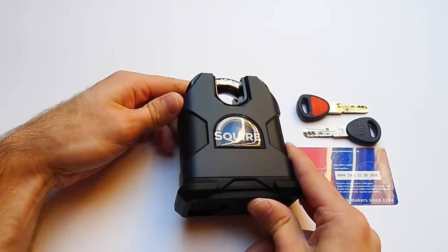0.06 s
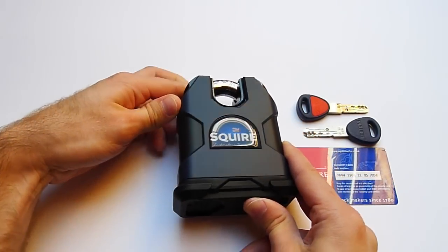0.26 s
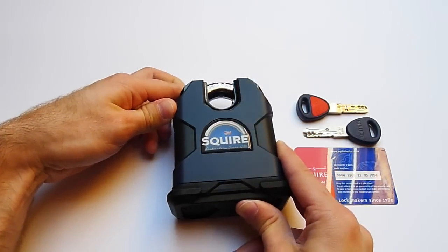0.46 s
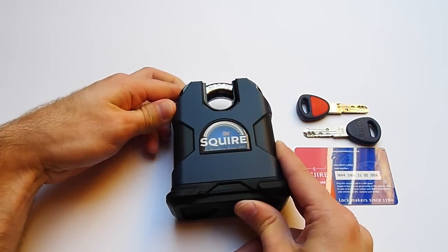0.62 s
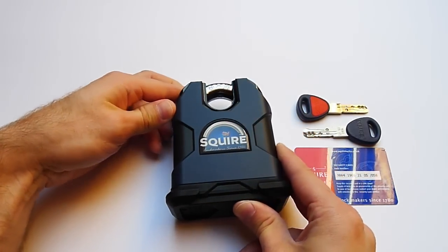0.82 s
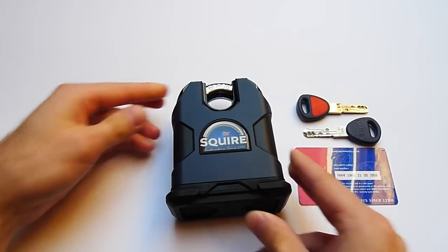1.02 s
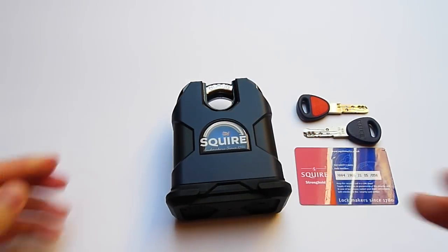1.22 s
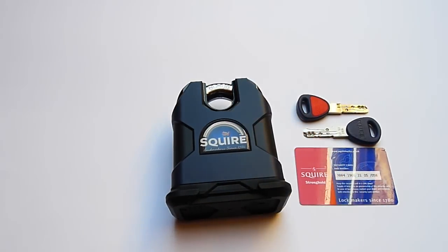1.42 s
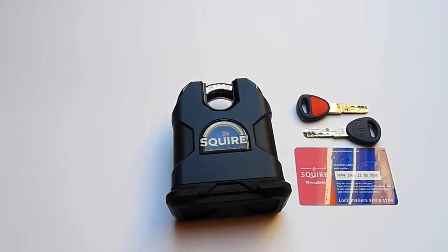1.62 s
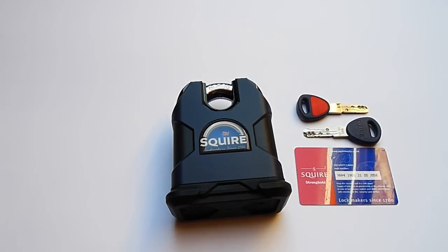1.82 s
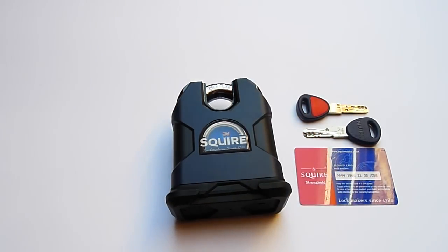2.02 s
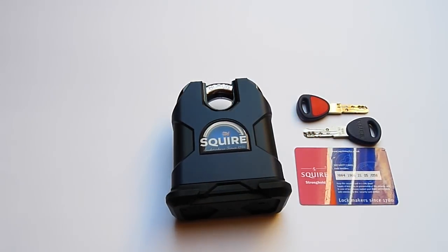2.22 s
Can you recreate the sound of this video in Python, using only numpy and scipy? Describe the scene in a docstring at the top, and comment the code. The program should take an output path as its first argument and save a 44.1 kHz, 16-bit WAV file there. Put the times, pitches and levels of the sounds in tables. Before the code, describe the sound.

One sharp metallic knock of a padlock landing on a table, followed later by small ticks.

```python
"""A heavy padlock drops flat on a hard table with one sharp knock and a short metallic ring.
Just before, as it is lowered, one edge scuffs and rocks on the table; afterwards fingers bump and
brush it as they let go. Later come a few small, crunchy ticks. It is all heard close up and in
mono, in a small, quiet room with a faint hum and electrical whine."""
import sys
import numpy as np
from scipy import signal
from scipy.fft import rfft, irfft, next_fast_len
from scipy.io import wavfile
from scipy.ndimage import uniform_filter1d

SR = 44100
rng = np.random.default_rng(int(sys.argv[2]) if len(sys.argv) > 2 else 0)


def wav_out(sig):
    """Save sig, one row per channel (or a flat mono array), as 16-bit PCM at SR to the path in sys.argv[1]."""
    wavfile.write(sys.argv[1], SR, np.round(np.clip(np.atleast_2d(sig).T, -1, 1) * 32767).astype(np.int16))


N = 103635
T = np.arange(N) / SR


def padlock_knock():
    """The lock drops flat: returns the hard crack of contact and the metallic ring it sets off."""
    # tone of metal hitting the table: freq_hz, gain_db
    contact_eq = [(100, -19), (300, -8), (700, -1), (1200, 2), (1900, 11), (2800, 7), (3200, 7), (3800, 12),
                  (5100, 8), (5750, -5), (6600, -12), (7500, -7), (7900, 5), (8900, -13), (9700, -28),
                  (12400, -23), (16000, -38)]
    # quick repeats as the lock seats and near surfaces answer: delay_s, level_db
    repeats = [(0.0027, -9), (0.00495, -18.5)]
    # ringing modes of lock and table: pitch_hz, level_db, t60_s
    modes = [(728, -39, 0.07), (1169, -33, 0.061), (1510, -35, 0.07), (1817, -36, 0.069),
             (1897, -29, 0.039), (2249, -33, 0.056), (2653, -23, 0.033), (2710, -24, 0.038),
             (2852, -14, 0.024), (3040, -20, 0.021), (3304, -39, 0.053), (3597, -40, 0.074),
             (3737, -19, 0.03), (4035, -34, 0.052), (4446, -27, 0.035), (4839, -37, 0.043),
             (5197, -31, 0.031), (6679, -46, 0.067), (7781, -34, 0.066), (8044, -46, 0.044),
             (8865, -31, 0.024), (12449, -46, 0.044)]
    knock_s, ring_attack_s = 0.29032, 0.0033
    hits = click(knock_s) + sum(from_db(db) * click(knock_s + delay) for delay, db in repeats)
    crack = colour(hits, contact_eq)
    ringing = sum(from_db(db) * ring(knock_s, hz, t60) for hz, db, t60 in modes)
    fade_in = 1 - np.exp(-since(knock_s) / ring_attack_s)
    return disperse(crack), disperse(fade_in * ringing)


def disperse(x):
    """All-pass resonances smear a sharp impact into a few cycles."""
    # resonances that briefly hold back parts of the impact: centre_hz, q
    resonances = [(2580, .5), (3470, 5.8), (8000, 3.5)]
    for hz, q in resonances:
        _, feedback = signal.iirpeak(hz, q, fs=SR)
        x = signal.lfilter(feedback[::-1], feedback, x + 1e-18)
    return x


def edge_roll():
    """The lock's edge rolls on the table: a low swell of noise just before the drop."""
    # dull tone of the roll: freq_hz, gain_db
    roll_eq = [(80, -34), (280, 3), (450, -4.5), (900, -10), (2500, -36)]
    return from_db(-46) * swell(peak_s=0.278, attack_s=0.028, release_s=0.03) * noise(roll_eq)


def soft_bumps():
    """Lock and fingers bump the table; each thud swells and dies within a few low cycles."""
    # dull thuds: start_s, level_db, pitch_hz, attack_s
    thuds = [(0.194, -36, 86, 0.0077), (0.243, -41.5, 130, 0.0024), (0.518, -34.5, 102, 0.0059),
             (0.545, -40.5, 111, 0.0043), (0.820, -47.5, 150, 0.0045), (0.8295, -32, 286, 0.0028),
             (0.847, -39, 138, 0.0037), (0.849, -44, 310, 0.0028), (0.867, -50.5, 300, 0.0032),
             (0.904, -44.5, 184, 0.0047)]
    out = np.zeros(N)
    for start_s, db, hz, attack_s in thuds:
        age = np.minimum(since(start_s) / attack_s, 20)
        envelope = from_db(db) * age * np.exp(1 - age)
        out -= envelope * np.sin(2 * np.pi * hz * since(start_s))
    return out


def scuffs():
    """Skin and casing slide in short strokes of grainy friction noise."""
    # sliding strokes: peak_s, level_db, attack_s, release_s
    strokes = [(0.03, -55, 0.09, .03), (0.198, -39, 0.0062, 0.01), (0.221, -55.5, 0.0043, 0.024),
               (0.92, -54.5, 0.068, 0.017)]
    # tone of the friction: freq_hz, gain_db
    friction_eq = [(300, -3.5), (1200, -5.5), (2400, -2.5), (3400, -6), (4600, 0.5), (6200, -2.5),
                   (7400, -9), (10000, -10.5), (14500, -14), (16000, -22)]
    grain_db = 1.5
    flutter = rms_one(uniform_filter1d(rng.standard_normal(N), size=30))
    friction = rms_one(from_db(grain_db * flutter) * noise(friction_eq))
    envelope = sum(from_db(db) * swell(s, attack, release) for s, db, attack, release in strokes)
    return envelope * friction


def small_ticks():
    """Each tick is a crunchy snap, bright or dull, with a short hollow ring."""
    # ticks: start_s, snap_db, crunch_decay_s, tilt_db_per_octave, ring_db, ring_hz, ring_t60_s
    ticks = [(2.0028, -12, 0.0054, -1, -41, 4160, 0.017), (2.004, -24, .001, 3, -44, 1157, 0.28),
             (2.0367, -10.5, 0.0015, -3, -44, 1600, 0.018), (2.0386, -1, 0.00058, -1, -32, 2110, 0.015),
             (2.0418, -6.5, 0.0027, -2, -31.5, 1780, 0.023), (2.0836, -15.5, .0004, 5.5, -24, 2000, 0.0065),
             (2.1044, -20, .0006, 7, -30, 2050, 0.008), (2.1074, -17, 0.0035, -7.5, -35, 1670, 0.015),
             (2.2407, -15, 0.00066, 7, -55, 3000, .006), (2.2427, -3, 0.00041, 3.5, -29.5, 1910, 0.014),
             (2.2433, -20, 0.0013, -3, -31, 1136, 0.013)]
    # tone shared by the snaps: freq_hz, gain_db
    snap_eq = [(300, -47), (800, -14), (1200, -8), (1900, -4), (2600, -3), (3150, -3.5), (3800, -7),
               (4400, -9.5), (5600, -8), (6900, -16), (8000, -11), (9000, -23), (10300, -18.5),
               (13000, -33), (16000, -28)]
    tilt_pivot_hz, ring_attack_s = 4000, 0.00056
    out = np.zeros(N)
    for start_s, snap_db, decay_s, tilt, ring_db, ring_hz, t60 in ticks:
        envelope = (T > start_s) * np.exp(-np.minimum(since(start_s) / decay_s, 20))
        crunch = energy_one(envelope * rng.standard_normal(N))
        snap = np.sqrt(0.5) * (click(start_s) + crunch)  # equal parts clean click and rough friction
        tilted_eq = [(hz, db + snap_db + tilt * np.log2(hz / tilt_pivot_hz)) for hz, db in snap_eq]
        fade_in = 1 - np.exp(-since(start_s) / ring_attack_s)
        out += colour(snap, tilted_eq) + from_db(ring_db) * fade_in * ring(start_s, ring_hz, t60)
    return out


def room_reverb(send):
    """Early scatter from the table and things on it, then the short tail of the room."""
    # tone of the tail: freq_hz, gain_db
    tail_eq = [(100, -13.5), (350, -3.5), (1000, -7), (2200, -14), (4000, -15.5), (6000, -16), (8000, -10),
               (13000, -13)]
    scatter = from_db(-14) * reflections(onset_s=0.004, t60_s=0.028)
    tail = colour(reflections(onset_s=0.0033, t60_s=0.2), tail_eq)
    return signal.fftconvolve(send, scatter + tail)[:N]


def reflections(onset_s, t60_s):
    """Dense dying echoes of unit energy."""
    envelope = (T > onset_s) * from_db(-60 * np.minimum(T / t60_s, 5))
    return energy_one(envelope * rng.standard_normal(N))


def room_tone():
    """A quiet bed of air with faint, wavering hums and electrical whines."""
    # tone of the air: freq_hz, gain_db
    air_eq = [(20, -30), (40, -10), (62, -10), (110, -2), (160, 1), (200, -4), (250, -2), (340, -6.5),
              (450, -6), (650, -8.5), (900, -10), (1300, -10.5), (1700, -7.5), (2300, -15.5), (3500, -16.5),
              (6000, -21.5), (7500, -24.5), (8500, -25.5), (13600, -31), (16000, -39)]
    # slow drift in its level: time_s, gain_db
    air_drift = [(0, 0.8), (.2, 0.8), (.42, -1), (.85, -0.44), (1.05, .5), (2.0, .4), (2.35, -0.5)]
    # hums and whines: pitch_hz, level_db, width_hz
    hums = [(176, -67, 8), (1163, -66, 6), (4000, -72.5, 40), (14924, -72.5, 10), (15624, -83, 4)]
    air_db = -50.5 + np.interp(T, *np.transpose(air_drift))
    out = from_db(air_db) * noise(air_eq)
    for hz, db, width_hz in hums:
        phase_wander = np.cumsum(rng.standard_normal(N)) * np.sqrt(2 * np.pi * width_hz / SR)
        out += from_db(db) * np.sqrt(2) * np.sin(2 * np.pi * hz * T + phase_wander)
    return out


def from_db(db):
    """Decibels to gain."""
    return 10 ** (np.asarray(db) / 20)


def rms_one(x):
    """Scale to unit rms."""
    return x / np.sqrt(np.mean(x ** 2) + 1e-20)


def energy_one(x):
    """Scale to unit energy."""
    return x / np.sqrt(np.sum(x ** 2) + 1e-20)


def colour(x, eq):
    """Minimum-phase EQ through points of freq_hz, gain_db: nothing rings ahead of a hit."""
    size = 2 * next_fast_len(N // 2 + 2048)
    hz, db = np.transpose(eq)
    freqs = np.maximum(np.fft.rfftfreq(size, 1 / SR), 1)
    gain = from_db(np.interp(np.log(freqs), np.log(hz), db))
    cepstrum = irfft(np.log(gain))
    cepstrum[1:size // 2] *= 2  # fold onto positive time to make the filter causal
    cepstrum[size // 2 + 1:] = 0
    return irfft(rfft(x, size) * np.exp(rfft(cepstrum)))[:N]


def noise(eq):
    """Coloured noise of unit rms."""
    return rms_one(colour(rng.standard_normal(N), eq))


def since(start_s):
    """Seconds elapsed since the start, zero before it."""
    return np.maximum(T - start_s, 0)


def click(start_s):
    """A unit impulse."""
    return 1.0 * (np.arange(N) == int(start_s * SR))


def ring(start_s, hz, t60_s):
    """One struck mode: a dying sine."""
    age = since(start_s)
    return np.sin(2 * np.pi * hz * age) * from_db(-60 * np.minimum(age / t60_s, 5))


def swell(peak_s, attack_s, release_s):
    """Envelope that rises exponentially to 1 and falls away."""
    distance = np.maximum((peak_s - T) / attack_s, (T - peak_s) / release_s)
    return np.exp(-np.minimum(distance, 20))


def scene():
    """Padlock, fingers and ticks over the room tone, the same in both channels."""
    crack, ringing = padlock_knock()
    contacts = crack + edge_roll() + soft_bumps() + scuffs() + small_ticks()
    reverb = room_reverb(contacts + from_db(-8) * ringing)  # the ring stays drier than the crack
    return np.tile(contacts + ringing + reverb + room_tone(), (2, 1))


def record(dry):
    """The microphone has a narrow notch in the treble; the very top is cut steeply."""
    notch_hz, cutoff_hz = 7530, 16000
    notched = signal.lfilter(*signal.iirnotch(notch_hz, Q=35, fs=SR), dry)
    lowpass = signal.ellip(12, 0.1, 70, cutoff_hz, fs=SR, output="sos")
    return signal.sosfilt(lowpass, notched)


dry = scene()
out = record(dry)
wav_out(out)
```